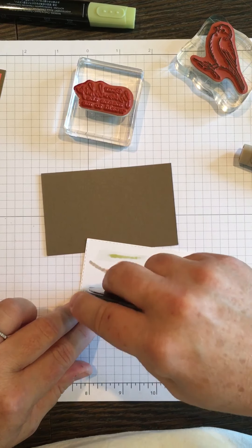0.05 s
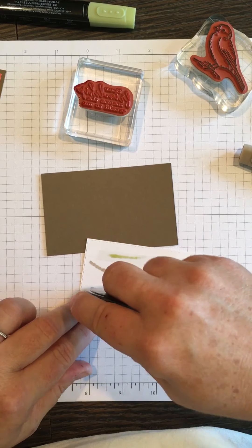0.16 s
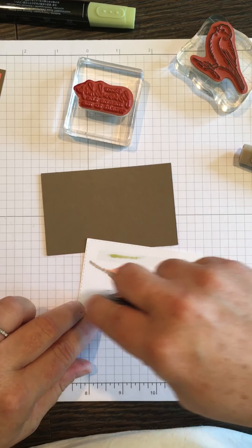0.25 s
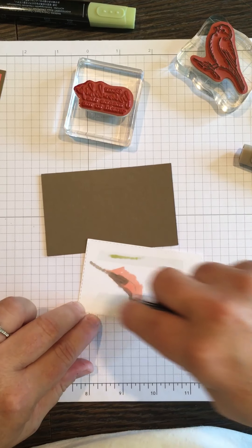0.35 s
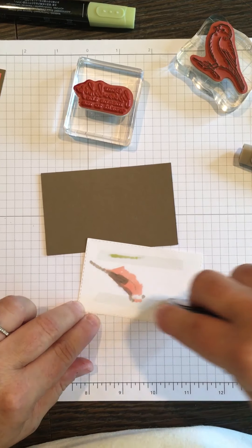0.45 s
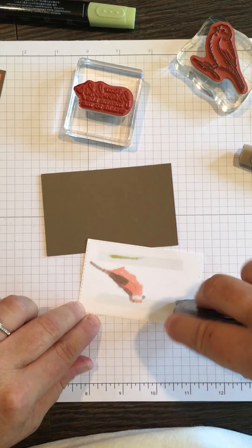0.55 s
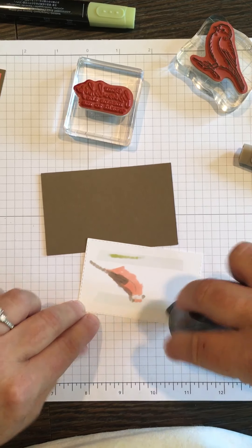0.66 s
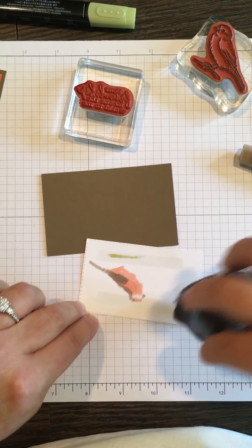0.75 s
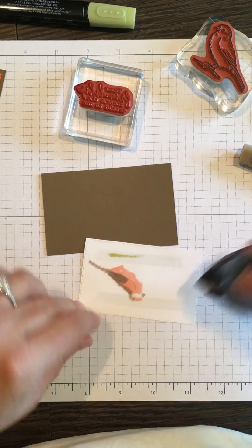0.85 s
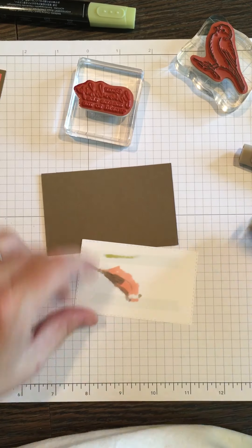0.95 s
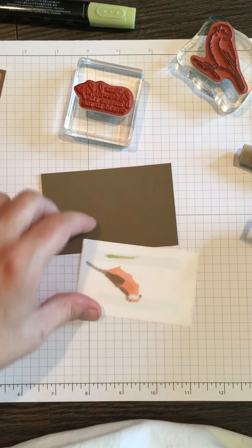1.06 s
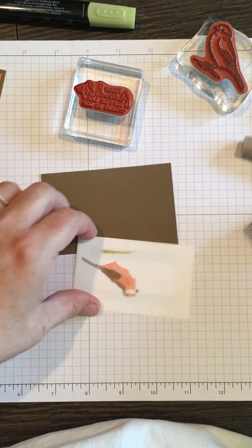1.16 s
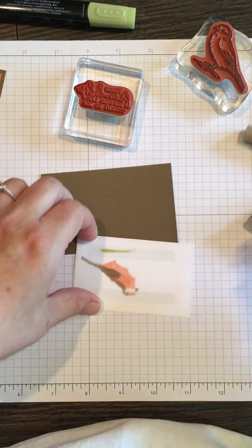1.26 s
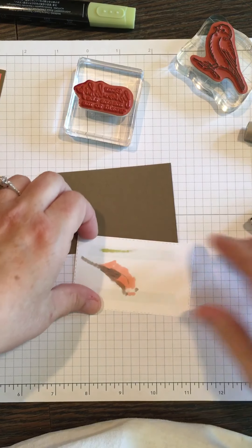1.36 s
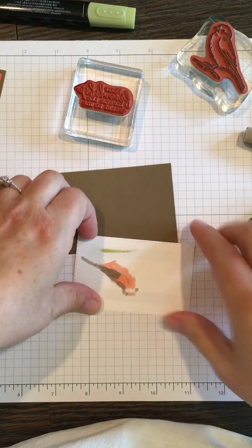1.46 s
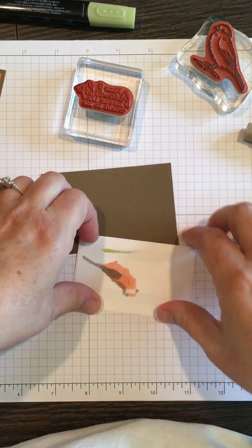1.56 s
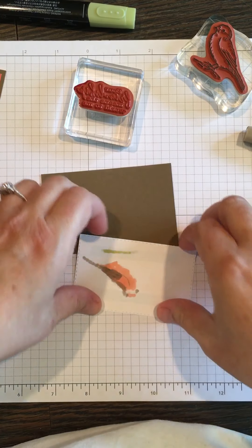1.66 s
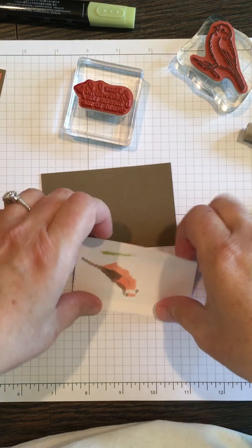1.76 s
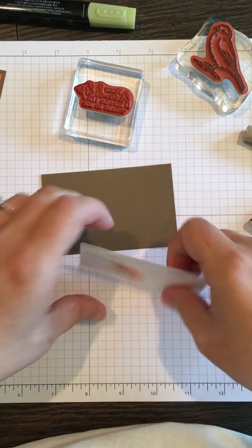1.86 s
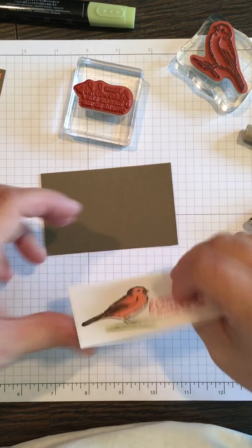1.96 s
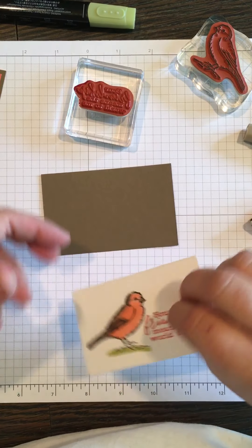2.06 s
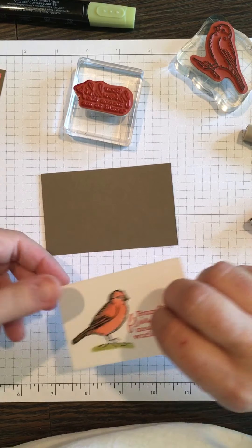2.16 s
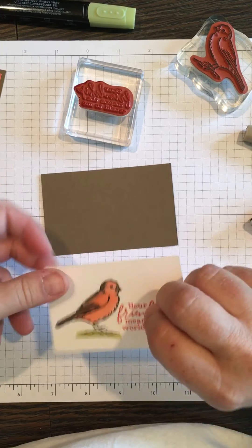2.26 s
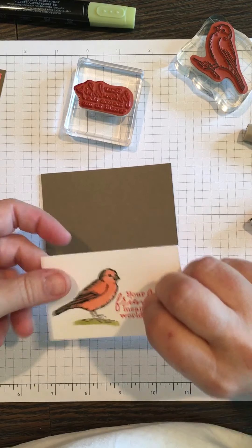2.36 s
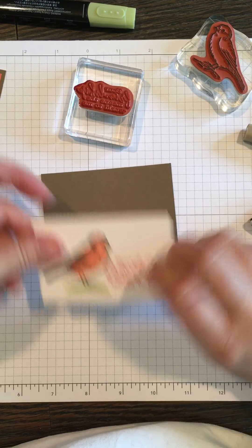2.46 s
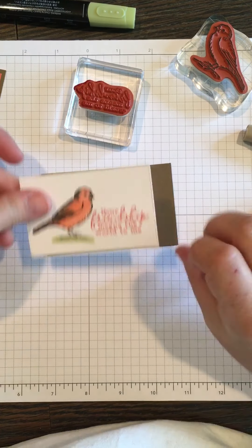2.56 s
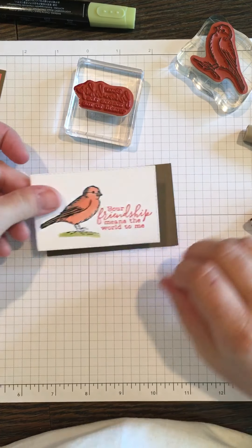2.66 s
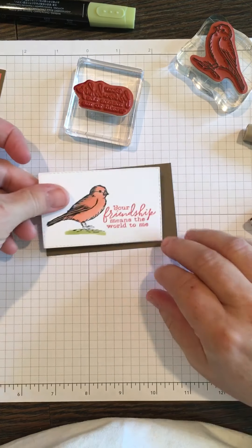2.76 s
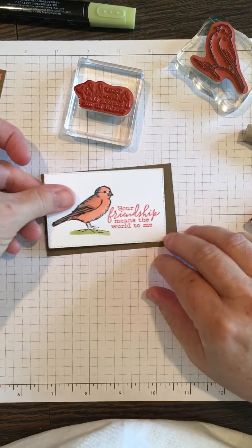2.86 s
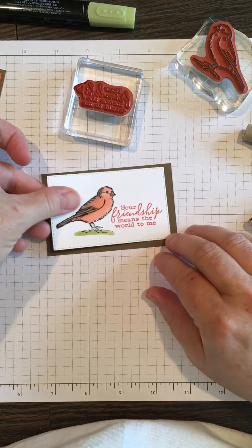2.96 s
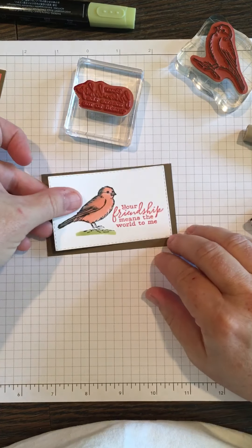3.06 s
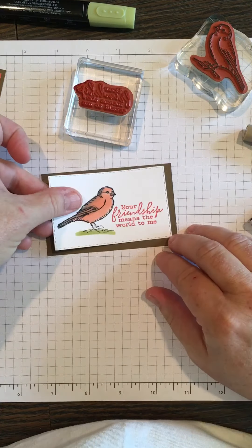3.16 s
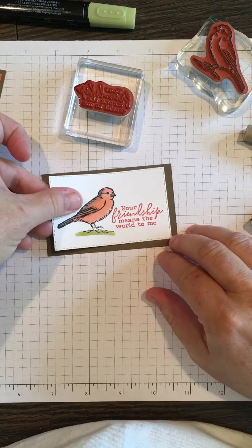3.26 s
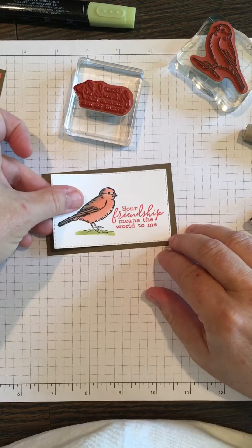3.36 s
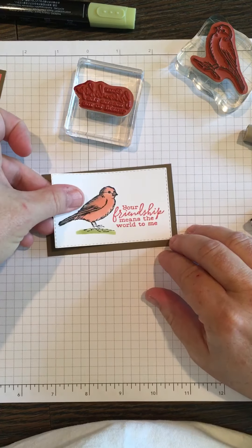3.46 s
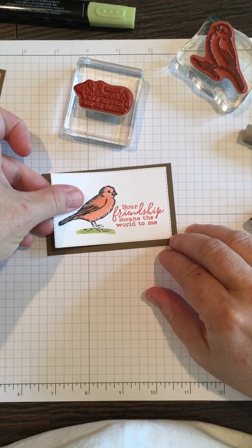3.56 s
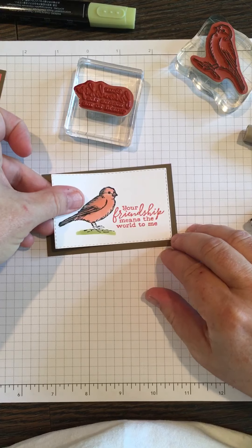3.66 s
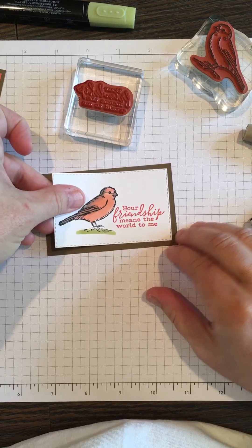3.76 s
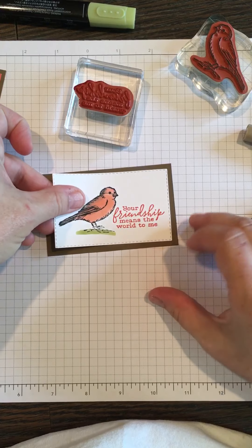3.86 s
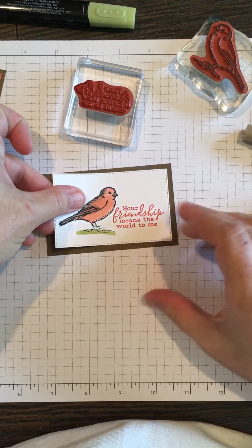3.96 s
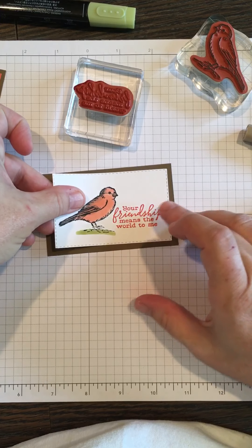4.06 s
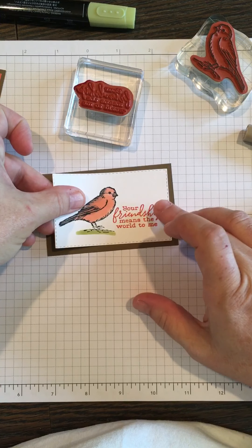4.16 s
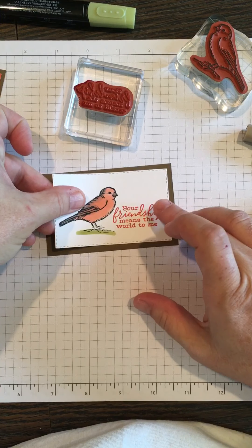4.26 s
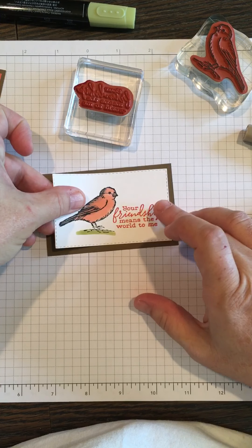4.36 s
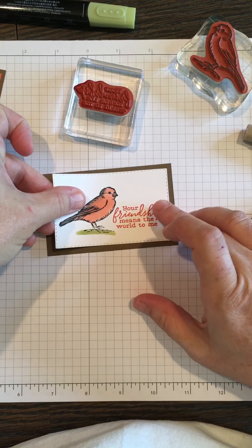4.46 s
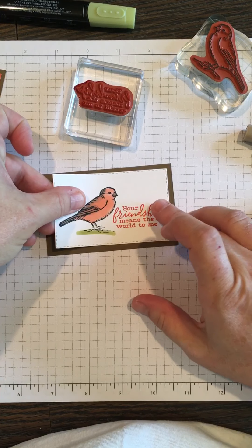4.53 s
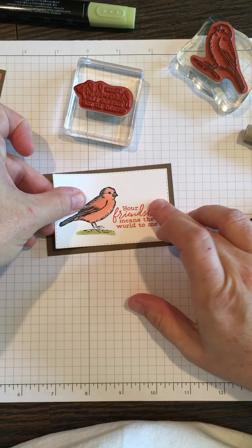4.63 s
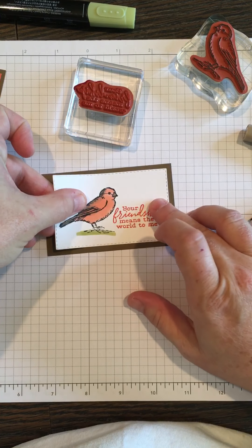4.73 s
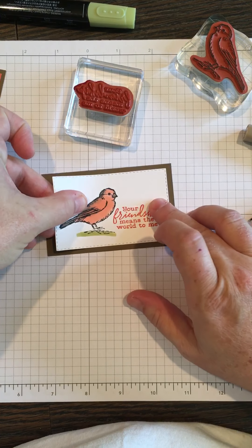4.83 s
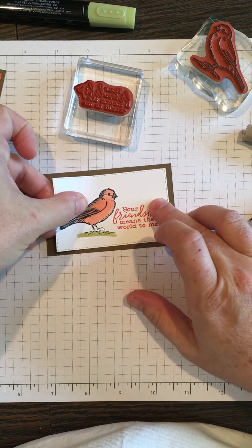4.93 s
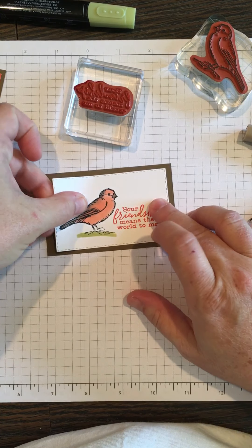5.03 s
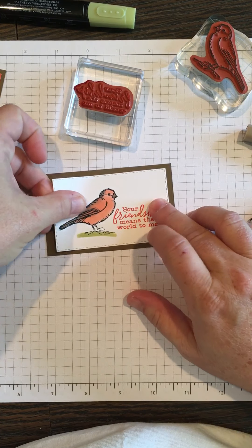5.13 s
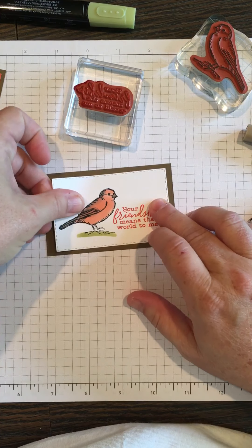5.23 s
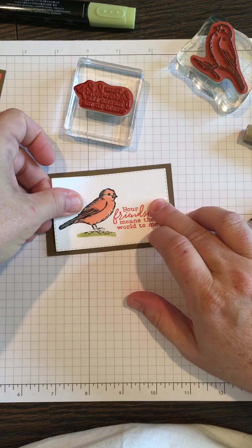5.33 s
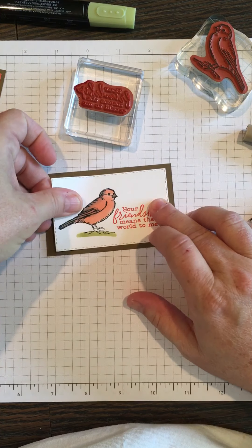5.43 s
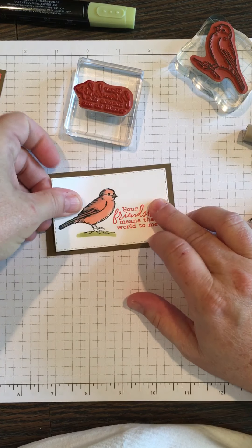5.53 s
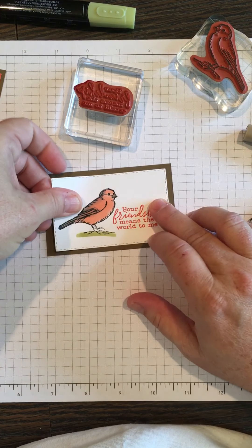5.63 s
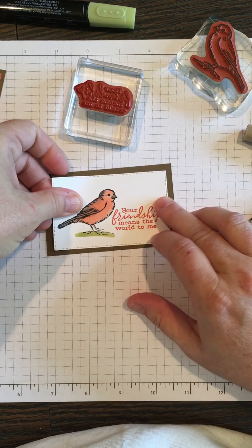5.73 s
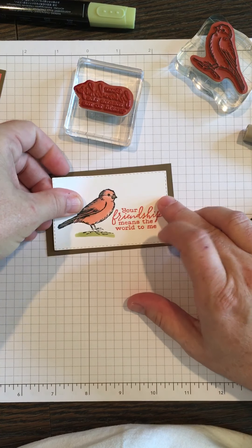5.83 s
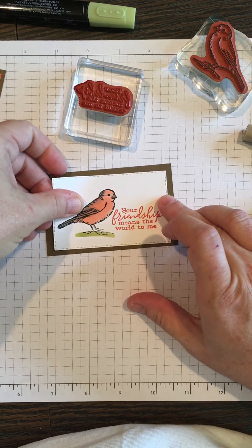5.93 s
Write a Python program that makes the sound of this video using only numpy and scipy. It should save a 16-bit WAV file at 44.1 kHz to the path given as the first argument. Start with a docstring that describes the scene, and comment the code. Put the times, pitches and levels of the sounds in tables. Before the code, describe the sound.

A close microphone above a craft table in a small, quiet room with low rumble and faint passing hum. After a tiny touch or two, at about 0.3 s a tape runner is pulled across card: a crisp, rapid plastic ratchet rasp of some thirty clicks, with thin high gear fizz and peeling tape, over by 0.63 s. Faint taps follow. From 1.1 to 1.4 s the hard plastic case is put down, rocking with irregular bright clacks and small thuds. Soft skin-on-paper rubbing and light ticks lead to the card being lifted and flipped around 1.85-2.1 s, with a short airy swish, an upward papery flick and dry snaps. Small taps and slides continue until 2.6 s. Then it is nearly still: faint brushing, two light ticks at 3.1 s, long quiet, and a little cluster of crisp taps and short scrapes at 5.0-5.1 s, then faint fingertip hiss near 5.8 s.

```python
"""A ratchet rasps over the thin fizz of small gears, a plastic case clacks down, then card taps and swishes.
A tape runner is drawn across cardstock: a pawl snaps over the spool's teeth, gears tick, tape peels off.
Its case is put down, then the card is picked up, flipped, laid on a mat and nudged into place: knocks are
short noise bursts, slides and brushing are shaped noise.
A small quiet room with a low rumble and passing hum, one microphone above the craft table."""
import sys
import numpy as np
from scipy import signal
from scipy.fft import rfft, irfft, next_fast_len
from scipy.io import wavfile
from scipy.ndimage import map_coordinates

SR = 44100
rng = np.random.default_rng(int(sys.argv[2]) if len(sys.argv) > 2 else 0)


def store_pcm(level_fs):
    """Save levels as 16-bit WAV."""
    pcm = np.round(np.clip(level_fs, -1, 1) * 32767).astype(np.int16)
    wavfile.write(sys.argv[1], SR, np.atleast_2d(pcm).T)


N = 264159

# how firmly the hands brush over the paper: (t/s, level/dB)
BRUSH_FIRMNESS = [(0, -76.5), (.28, -74.5), (.66, -61), (.8, -64), (1.09, -65), (1.33, -52.5),
                  (1.44, -61.5), (1.7, -66), (1.8, -60.5), (1.97, -70.5), (2.33, -68.5), (2.62, -66),
                  (2.87, -71.5), (3.5, -72.5), (3.62, -74), (4.4, -76), (5.25, -73.5), (5.6, -71.5)]


def runner(ticks_per_tooth=7):
    """The pawl snaps over each tooth, the gears tick several times as often, and tape peels off in between."""
    # travel of the spool during the stroke: (t/s, ratchet teeth passed)
    spool_travel = [(.3238, 0), (.3438, 1), (.3582, 2), (.4158, 8), (.448, 12), (.4783, 16), (.5143, 21),
                    (.5682, 27), (.6073, 30), (.6236, 31)]
    # force of the stroke: (t/s, ratchet level/dB, tape peel level/dB, press on the card/dB)
    stroke_force = [(.325, -22, -47, -13.5), (.345, -23.5, -44, 11.5), (.365, -20.5, -34, 9),
                    (.405, -23, -35, 2), (.455, -31, -35.5, 0), (.505, -25, -34, -9), (.55, -25, -42, -16),
                    (.575, -24.5, -40, 4), (.626, -23, -54, -11)]
    # colours of the case, the gears and the peeling tape: (f/Hz, relative level/dB)
    case_colour = [(150, -29), (300, -13), (500, -36), (900, -17), (1380, -5), (1750, -16), (2400, -8),
                   (3150, 0), (3900, -4.5), (4900, -7.5), (6500, -6.5), (8000, -9.5), (11000, -4),
                   (14500, -1)]
    gear_colour = [(2000, -40), (7000, -17), (10500, -17), (12300, -6.5), (13200, -2), (15300, 3),
                   (16500, -6)]
    peel_colour = [(120, -68.5), (200, -41), (278, -27), (424, -37.5), (821, -24), (1400, -4.5),
                   (2050, -10), (3130, -5.5), (4860, -10), (6640, -14), (7540, -22), (14900, -4.5),
                   (16000, -6)]
    # modes of the case that the ratchet sets ringing: (f/Hz, t60/s, level/dB)
    case_modes = [(3193, 0.019, -14), (3230, 0.063, -25.5), (4610, 0.033, -25), (6740, 0.017, -18.5)]
    # modes that sound as the case is pressed on the card: (f/Hz, t60/s, level/dB)
    press_modes = [(1385, 0.03, -26.5), (1453, 0.17, -29)]
    # the gears bind briefly and fizz louder: (t at the crest/s, extra level/dB)
    gear_binds = [(.362, 8), (.39, 6.5), (.455, 8.5), (.578, 7)]
    bind_half_s = .015
    free_ring_db, damping_db = 0.5, -3  # ring of the unpressed case; how strongly pressing damps it
    base_gear_db, take_up_db, take_up_s = -34, -10, .035  # fizz starts weaker while slack is taken up

    s, teeth = np.transpose(spool_travel)
    ratchet_db, peel_db, press_db = curves(stroke_force)
    t, now = np.arange(SR // 50) / SR, np.arange(N) / SR

    pawl = np.zeros(N)
    for at in np.interp(np.arange(teeth[-1] + 1), teeth, s):
        snap = burst(fade(t, attack=.0035, t60=0.013))
        add(pawl, at, snap * amp(rng.normal(1, .8)))
    pawl = pawl * amp(ratchet_db)
    damping = 1 + amp(press_db + damping_db) ** 2
    free = amp(free_ring_db + 2 * wobble(90)) / damping
    ratchet = ring(pawl, case_colour)
    ratchet = ratchet + modal(pawl * free, case_modes) + modal(pawl * amp(press_db), press_modes)

    ticks = np.zeros(N)
    for at in np.interp(np.arange(teeth[-1] * ticks_per_tooth) / ticks_per_tooth, teeth, s):
        tick = burst(fade(t, attack=.0001, t60=0.0026))
        add(ticks, at + rng.normal(0, 0.000073), tick * amp(rng.normal(8.6, 4.1)))
    slack = bump((now - s[0]) ** 2, take_up_s ** 2)  # flat-topped
    binding_db = sum(db * bump(now - at, bind_half_s) for at, db in gear_binds)
    gear_db = base_gear_db + take_up_db * slack + binding_db
    gears = ring(ticks * amp(gear_db), gear_colour)

    rolling = (now >= s[0]) & (now <= s[-1])  # tape peels only while the spool turns
    peel = coloured(peel_colour) * rolling * amp(peel_db + 2.5 * wobble(700))
    return ratchet + gears + peel


def set_down():
    """The plastic case lands, rocks and settles with a graze and a clack each time; the table thuds under it."""
    # the case lands and rocks: (t/s, level/dB, hardness/dB, table thud level/dB, t60/s)
    clack_list = [(1.1135, -24, 9, -49.5, 0.021), (1.1192, -40, -4, -53.5, 0.037),
                  (1.188, -30, 1, -48.5, 0.026), (1.192, -28.5, 2.5, -40, .007),
                  (1.204, -40, 1, -49.5, 0.052), (1.2409, -22, 14, -53.5, .014),
                  (1.2781, -29, -3, -50, 0.011), (1.2794, -19, -.5, -39, .011),
                  (1.2967, -44.5, 6, -58, .008), (1.312, -46.5, 3.5, -54, .03),
                  (1.363, -38, 2.5, -50.5, .017), (1.38, -41.5, 4.5, -57.5, 0.032),
                  (1.402, -47, 1, -63, .048)]
    # broad resonances of the knocked case: (f/Hz, width/Hz, level/dB)
    shell_modes = [(1227, 150, -1), (1790, 100, 6.5), (2660, 300, -0.5), (3120, 250, 1.5), (4260, 400, -5)]
    graze_s, graze_db = .003, -24  # a corner grazes the table just before each clack
    track = np.zeros(N)

    def shell(hz):
        """The modes of the case add in power inside a soft band."""
        power = sum((amp(db) * resonance(hz, f, width)) ** 2 for f, width, db in shell_modes)
        return band(hz, 1000, 4800) * np.sqrt(power)

    table = lambda hz: band(hz, 40, 1300) * resonance(hz, 145, 220)
    for s, db, hardness_db, thud_db, t60 in clack_list:
        levels = parts_db(db, hardness_db, thud_db)
        add(track, s - graze_s, contact(levels + graze_db, t60, shell, table, thud_t60=.15))
        add(track, s, contact(levels, t60, shell, table, thud_t60=0.12))
    return track


def taps():
    """Light, dry clicks and touches of runner, card and fingers; fainter stray ones follow the brushing level."""
    # light clicks and touches: the runner engaging at .293 s, then fingertips and card edges on the mat:
    # (t/s, level/dB, hardness/dB, table thud level/dB, t60/s)
    tap_list = [(0.1156, -53, -5.5, -55, .012), (0.1268, -61, -11.5, -68, 0.0064),
                (0.2933, -52, -5, -75, .011), (.6789, -52, 11, -65.5, 0.017),
                (0.8312, -49.5, -3, -58.5, 0.019), (.8549, -56, 10, -77, .019),
                (0.8995, -44, 3, -59.5, 0.017), (1.4538, -54.5, -0.5, -59, 0.031),
                (1.4882, -50, -5, -52.5, .017), (1.5569, -54, 4, -52.5, .038),
                (1.5702, -54.5, -8, -70, 0.0095), (1.747, -49, 8.5, -60.5, 0.0084),
                (1.8464, -43.5, 1, -61.5, 0.026), (2.0406, -48.5, 2, -53.5, .02),
                (2.0718, -40.5, 2, -71, 0.0072), (2.0842, -41.5, 8, -72, .01),
                (2.2288, -52.5, 5.5, -65, 0.04), (2.3152, -42.5, -3.5, -56, .014),
                (2.3419, -52, 2, -56, .014), (2.445, -46.5, -5, -55, .012), (2.5092, -56, 1.5, -60, 0.028),
                (2.7561, -62, -5.5, -68, .016), (2.8583, -54, -1.5, -69, 0.015),
                (3.1347, -49, -4, -62, 0.038), (3.1398, -47.5, 5, -68.5, 0.013),
                (3.5065, -56.5, 2.5, -75, 0.017), (4.9163, -64, -3.5, -69, 0.018),
                (4.9949, -44, 5.5, -49, 0.022), (5.0989, -46.5, 4, -53.5, 0.018),
                (5.1238, -46, 6.5, -55.5, .017), (5.536, -67, -6, -63, .016)]
    strays_per_s, over_brush_db, spread_db = 5, 2.5, 4
    stray_hardness_db, stray_thud_db, stray_t60_s = -4.5, -66.5, .014
    track = np.zeros(N)
    card = lambda hz: band(hz, 900, 4500)
    mat = lambda hz: band(hz, 100, 700) * resonance(hz, 194, 300)
    strays = []
    for when, size in rng.random((round(strays_per_s * N / SR), 2)):
        s = when * N / SR
        db = np.interp(s, *np.transpose(BRUSH_FIRMNESS)) + over_brush_db + spread_db * (2 * size - 1)
        strays.append((s, db, stray_hardness_db, stray_thud_db, stray_t60_s))
    for s, db, hardness_db, thud_db, t60 in tap_list + strays:
        levels = parts_db(db, hardness_db, thud_db)
        add(track, s, contact(levels, t60, card, mat, thud_t60=0.038))
    return track


def swishes():
    """The card's edge scrapes over paper fibres; a sliding or flexing sheet sounds one broad resonance."""
    # the card slides over the mat: (t at the crest/s, half length/s, level/dB, pitch/Hz)
    slide_list = [(0.12, 0.014, -65, 2200), (0.829, .025, -57, 2210), (.917, 0.018, -50.5, 3600),
                  (1.88, 0.015, -47.5, 1840), (1.914, .029, -38.5, 2970), (2.066, 0.023, -42.5, 3000),
                  (2.125, 0.014, -50.5, 4000), (2.429, 0.0059, -58.5, 9000), (2.456, 0.0075, -54, 1500),
                  (2.586, .015, -56.5, 7000), (3.03, .02, -68, 2900), (3.094, 0.012, -60, 3080),
                  (3.453, 0.015, -65.5, 3080), (4.828, 0.026, -71, 6000), (5.01, .016, -54, 4500),
                  (5.125, .015, -46, 5750), (5.465, .012, -71, 2200), (5.59, 0.027, -72.5, 2800),
                  (5.92, 0.018, -71, 2000)]
    # card or case flexes with a hollow note: (t at the crest/s, half length/s, level/dB, pitch/Hz)
    flex_list = [(.12, 0.013, -55, 130), (0.295, 0.0019, -41.5, 3200), (1.26, 0.013, -44, 1000),
                 (1.296, .007, -46.5, 1230), (1.374, .018, -54, 900), (2.0505, 0.0021, -38.5, 900),
                 (2.073, 0.0044, -41.5, 3500), (2.453, 0.0057, -51, 520), (2.63, 0.066, -72, 1380),
                 (5.012, .018, -52.5, 300), (5.126, 0.0033, -40.5, 5530)]
    # colour of the scraping card edge: (f/Hz, relative level/dB)
    card_colour = [(180, -66), (300, -19), (762, -27.5), (1030, -3.5), (1390, -37), (1660, 2), (1900, -7.5),
                   (3400, -0.5), (4990, -5), (15000, 2.5), (16000, -6.5)]
    rise_share, fall_share = 1.16, .8  # a slide builds more slowly than it stops
    sheet_db, sheet_grows = -29, 0.54  # the sheet's tone grows more slowly than the scrape
    slide_width, flex_width = 0.59, .38  # set the breadth of the resonance relative to its pitch
    scraping, sounding = np.zeros(N), np.zeros(N)
    t = np.arange(-SR // 3, SR // 3) / SR

    def sheet(pitch_hz, width):
        """Noise through a steep resonance of the sheet."""
        return noise(lambda hz: resonance(hz, pitch_hz, 2 * width * pitch_hz) ** 4, size=len(t))

    for s, half, db, pitch_hz in slide_list:
        swell = bump(t, half * np.where(t < 0, rise_share, fall_share))
        scrape = noise(lambda hz: amp(along(card_colour, hz)), size=len(t))
        add(scraping, s + t[0], swell * amp(db) * scrape)
        add(sounding, s + t[0], swell * amp(sheet_db + sheet_grows * db) * sheet(pitch_hz, slide_width))
    for s, half, db, pitch_hz in flex_list:
        add(sounding, s + t[0], bump(t, half) * amp(db) * sheet(pitch_hz, flex_width))
    grip = np.tanh(wobble(450))  # the edge catches and slips on the fibres
    return scraping * amp(3.9 * grip - 0.65) + sounding * amp(1.5 * grip)


def lifts():
    """As the card peels and bends away from the mat, its rough note sweeps upward."""
    # (t at the crest/s, half length/s, level/dB, pitch at the crest/Hz, sweep/octaves per s)
    lift_list = [(1.908, 0.014, -49, 2056, 22), (2.051, 0.0097, -42.5, 881, 55)]
    lift_width = 0.3  # flutter bandwidth over pitch
    track = np.zeros(N)
    t = np.arange(-SR // 20, SR // 20) / SR
    for s, half, db, pitch_hz, octaves in lift_list:
        phase = 2 * np.pi * np.cumsum(pitch_hz * 2 ** (octaves * t)) / SR
        flutter = lambda: noise(lambda hz: bump(hz, lift_width * pitch_hz), size=len(t))
        note = flutter() * np.cos(phase) + flutter() * np.sin(phase)
        add(track, s + t[0], amp(db) * bump(t, half) * note)
    return track


def brushing():
    """Skin and paper rub softly; a firmer rub catches more fibres and crackles. Gliding fingertips add hiss."""
    # colours of the scrape and the hiss: (f/Hz, relative level/dB)
    scrape_colour = [(240, -31), (400, -2.5), (571, -0.5), (712, -5), (979, 0), (1190, 1), (1330, -1),
                     (1640, -4), (2520, -3.5), (4590, -7), (4820, -10.5), (6550, -5), (7500, -14),
                     (9750, -37), (16500, -120)]
    hiss_colour = [(4500, -31), (6500, -9.5), (7600, -9), (9200, -0.5), (10400, -6.5), (12000, 1),
                   (15200, 2), (16000, -9)]
    # fingertips glide with a thin hiss: (t at the crest/s, half length/s, level/dB)
    glide_list = [(0.93, 0.03, -58.5), (1.0, 0.061, -63), (1.085, 0.022, -58), (1.65, 0.052, -62),
                  (1.923, .025, -46), (2.25, .02, -61), (2.615, 0.056, -57.5), (2.772, 0.037, -65),
                  (3.91, 0.044, -67.5), (4.083, 0.051, -67), (5.031, .025, -56.5), (5.759, 0.032, -57),
                  (5.868, 0.018, -68)]
    hiss_db, hiss_grows = -13, 0.81  # the hiss grows more slowly than the scrape
    firm_db, = curves(BRUSH_FIRMNESS)
    scrape_db = firm_db + 1.2 * wobble(14)
    gliding = sum(amp(db) * bump(np.arange(N) / SR - s, half) for s, half, db in glide_list)
    hiss = np.hypot(amp(hiss_db + hiss_grows * scrape_db), gliding)
    catching = np.clip((scrape_db + 79) / 20, .02, .5)  # share of power in the crackle
    grain = wobble(55) * catching

    def rub(colour):
        """Smooth rubbing noise crossfaded with the crackle of caught fibres."""
        crackle = ring(grains(rate=560, spread_db=3), colour)
        return np.sqrt(1 - catching) * coloured(colour) + np.sqrt(catching) * crackle

    scrape = rub(scrape_colour) * amp(scrape_db + 4.2 * grain)
    return scrape + rub(hiss_colour) * hiss * amp(1.5 * grain)


def background():
    """Low room rumble is shaped noise; faint hums swell briefly as sines with a wandering phase."""
    # colour of the rumble: (f/Hz, relative level/dB)
    rumble_colour = [(13, -44.5), (22, -19), (43, 1), (76, -3.5), (108, -4), (146, -7), (200, -8.5),
                     (317, -19), (346, -17.5), (578, -29), (620, -25.5), (767, -28.5), (964, -32),
                     (1500, -37.5), (1950, -62), (3300, -120)]
    # a faint low hum comes and goes: (t at the crest/s, half length/s, f/Hz, level/dB)
    hum_list = [(0.11, 0.24, 94.4, -53.5), (0.91, 0.38, 80, -60.5), (3.205, 0.026, 162.6, -55.5),
                (4.887, 0.081, 171.6, -56.5), (5.871, .17, 128.2, -59.5)]
    t = np.arange(N) / SR
    hum = np.zeros(N)
    for s, half, hz, db in hum_list:
        hum += amp(db) * bump(t - s, half) * np.sin(2 * np.pi * hz * t + .4 * wobble(23))
    return amp(-62.5) * coloured(rumble_colour) + hum


def room(x, gap=.005, echo=.012):
    """The walls answer after a short gap (s), the top treble dying fastest; a near surface adds a soft echo."""
    # decay of the room: (f/Hz, t60/s)
    room_decay = [(150, .35), (1200, 0.16), (4000, 0.23), (15000, 0.07)]
    # colour of the reverberation: (f/Hz, relative level/dB)
    room_colour = [(200, 9.5), (1200, 2), (3000, -1.5), (9000, -2.5), (15000, -1.5)]
    hz, t, z = signal.stft(rng.standard_normal(SR // 2), SR, nperseg=256)
    early = 1 + 0.87 * np.exp(-t / .012)  # stronger first reflections
    decay = amp(-60 * t / along(room_decay, hz)[:, None])
    tail = signal.istft(z * early * decay, SR, nperseg=256)[1]
    tail = np.pad(tail / np.linalg.norm(tail), (round(gap * SR), 0))
    delay = np.arange(len(tail)) / SR
    tail = tail * (0.86 + 1.0 * bump(delay - echo, 0.0014))
    return ring(signal.fftconvolve(x, tail)[:N], room_colour)


def contact(colour_db, t60, body, table, thud_t60):
    """One blow: the table thuds, the struck thing rings, its edge clicks and snaps."""
    t = np.arange(SR // 5) / SR
    thud_db, body_db, edge_db, snap_db = colour_db
    thud = noise(table, size=len(t)) * fade(t, attack=.002, t60=thud_t60)
    middle = noise(body, size=len(t)) * fade(t, attack=.0012, t60=1.12 * t60)
    edge = noise(lambda hz: band(hz, 3400, 9500), size=len(t)) * fade(t, attack=0.00031, t60=t60)
    snap = noise(lambda hz: band(hz, 12000, 16500), size=len(t)) * fade(t, attack=0.00028, t60=0.92 * t60)
    return amp(thud_db) * thud + amp(body_db) * middle + amp(edge_db) * edge + amp(snap_db) * snap


def parts_db(level_db, hardness_db, thud_db):
    """Levels of thud, body, edge and snap: a harder contact has more snap and less body."""
    return np.array([thud_db, level_db - hardness_db, level_db, level_db + hardness_db])


def burst(envelope):
    """A rattle of tiny impacts under an envelope, its random colour half evened out."""
    spectrum = rfft(rng.standard_normal(len(envelope)) * envelope)
    evened = spectrum / np.sqrt(np.abs(spectrum) + 1e-9)
    x = irfft(evened, len(envelope)) * np.sqrt(envelope)
    return x * np.linalg.norm(envelope) / np.linalg.norm(x)


def grains(rate, spread_db):
    """Sparse random impulses, rate a second, of uneven size, rms 1."""
    hits = rng.random(N) < rate / SR
    sizes = amp(spread_db * np.minimum(rng.exponential(size=N), 2))
    return unit(hits * rng.choice([-1, 1], N) * sizes)


def modal(x, modes):
    """x rings a set of decaying (f/Hz, t60/s, level/dB) modes."""
    t = np.arange(SR // 10) / SR

    def mode(hz, t60):
        """A decaying sine, differenced because a small body radiates little bass."""
        return np.diff(np.sin(2 * np.pi * hz * t) * amp(-60 * t / t60))

    response = sum(amp(db) * unit(mode(hz, t60)) for hz, t60, db in modes)
    return signal.fftconvolve(x, response / np.sqrt(len(t)))[:N]


def ring(x, points, size=2048):
    """x drives a body with a (f/Hz, level/dB) response: minimum phase by folded cepstrum, energy 1."""
    cepstrum = irfft(np.log(amp(along(points, np.fft.rfftfreq(size, 1 / SR)))))
    cepstrum[1:size // 2] *= 2
    cepstrum[size // 2 + 1:] = 0
    response = irfft(np.exp(rfft(cepstrum)))
    return signal.fftconvolve(x, response / np.linalg.norm(response))[:N]


def noise(gain, size=N):
    """Noise of rms 1 whose spectrum follows gain(Hz)."""
    m = next_fast_len(size + 64)
    spectrum = rfft(rng.standard_normal(m)) * gain(np.fft.rfftfreq(m, 1 / SR))
    return unit(irfft(spectrum, m)[:size])


def coloured(points):
    """Noise of rms 1 with a (f/Hz, level/dB) spectrum."""
    return noise(lambda hz: amp(along(points, hz)))


def band(hz, lo_hz, hi_hz):
    """Gain of a soft-edged band."""
    return 1 / np.sqrt((1 + (lo_hz / (hz + 1)) ** 8) * (1 + (hz / hi_hz) ** 8))


def resonance(hz, centre_hz, width_hz):
    """Gain of one damped mode."""
    return 1 / np.sqrt(1 + (2 * (hz - centre_hz) / width_hz) ** 2)


def fade(t, attack, t60):
    """Envelope of a contact: fast rise, exponential decay, top 1."""
    shape = (1 - np.exp(-t / attack)) * amp(-60 * t / t60)
    return shape / shape.max()


def bump(t, half):
    """A smooth swell around t = 0, top 1."""
    return np.exp(-(t / half) ** 2)


def wobble(rate):
    """A smooth random curve, rate knots a second."""
    knots = rng.standard_normal(int(N * rate / SR) + 4)
    return map_coordinates(knots, [np.arange(N) * rate / SR])


def curves(rows):
    """One value per sample for each column after the time."""
    s, *cols = np.transpose(rows)
    return [np.interp(np.arange(N) / SR, s, c) for c in cols]


def along(points, hz):
    """(f/Hz, value) points read on a log frequency axis."""
    f, v = np.transpose(points)
    return np.interp(np.log(hz + 1), np.log(f + 1), v)


def add(track, s, sound):
    """Mix a sound into the track at time s, trimmed to the track."""
    start = round(s * SR)
    sound, start = sound[max(0, -start):], max(0, start)
    track[start:start + len(sound)] += sound[:max(0, N - start)]


def amp(db):
    """Decibels to gain."""
    return 10 ** (np.asarray(db) / 20)


def unit(x):
    """Scaled to rms 1."""
    return x / np.sqrt(np.mean(x ** 2) + 1e-20)


def scene():
    """Runner, case and paper sound direct and off the walls; brushing and background stay direct."""
    rasp, clacks, paper = runner(), set_down(), taps() + swishes() + lifts()
    walls = room(amp(-11.0) * rasp + amp(-12.5) * clacks + amp(-11.5) * paper)
    return (rasp + clacks + paper + walls + brushing() + background())[None]


def record(dry):
    """The microphone sheds the deepest bass; the treble falls steeply at the band limit."""
    m = next_fast_len(N + SR // 2)
    hz = np.fft.rfftfreq(m, 1 / SR)
    low_pass = (1 - np.tanh((hz - 15950) / 110)) / 2  # centre and slope width in Hz
    return irfft(rfft(dry, m) * band(hz, 37, SR) * low_pass, m)[..., :N]


dry = scene()
out = record(dry)
store_pcm(out)
```